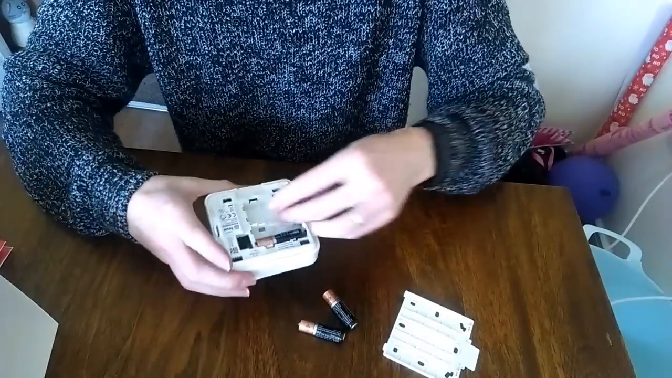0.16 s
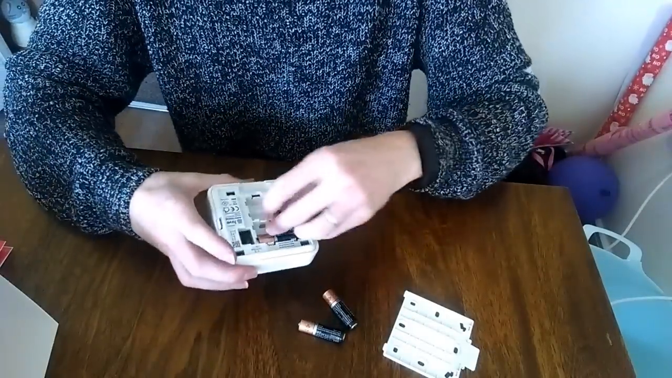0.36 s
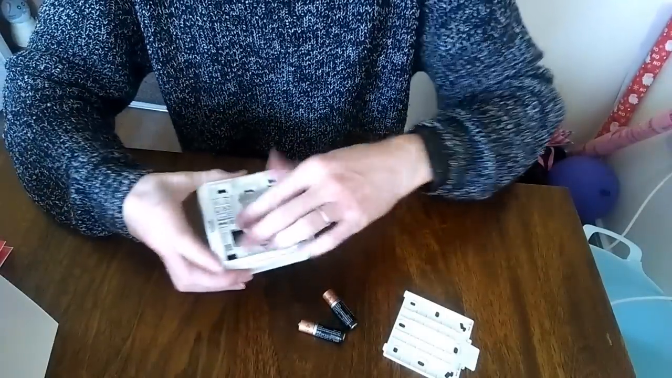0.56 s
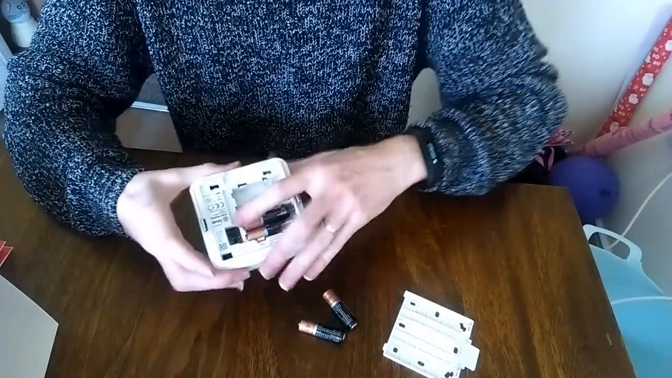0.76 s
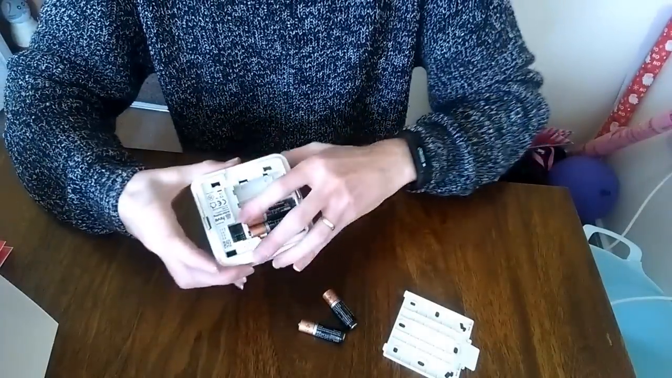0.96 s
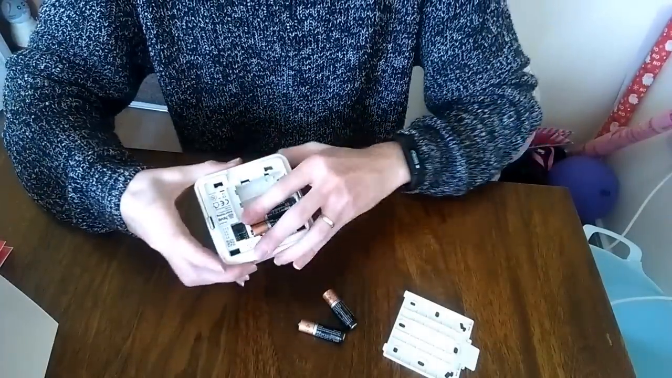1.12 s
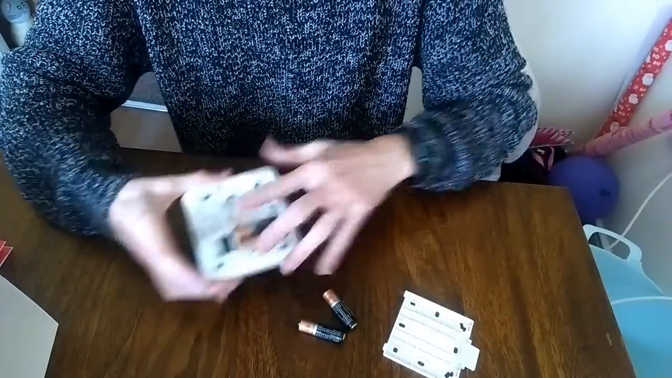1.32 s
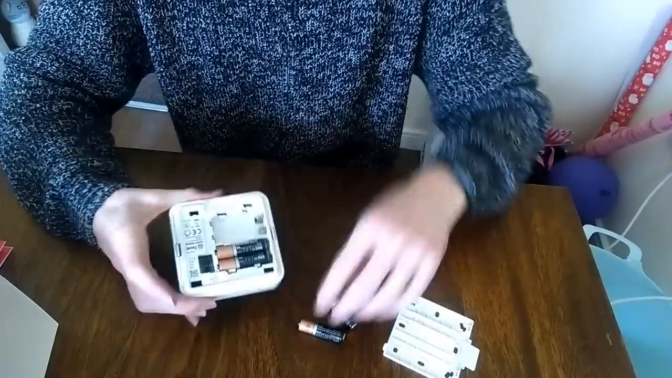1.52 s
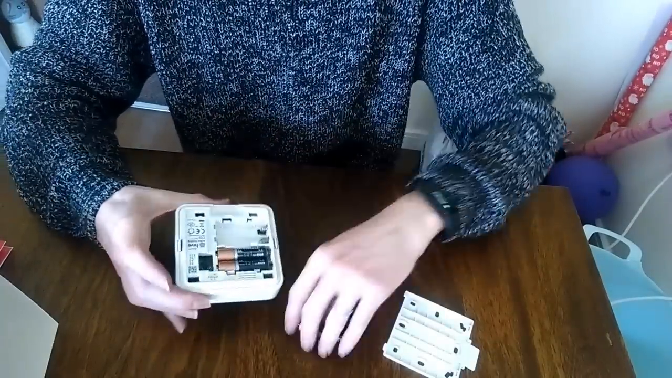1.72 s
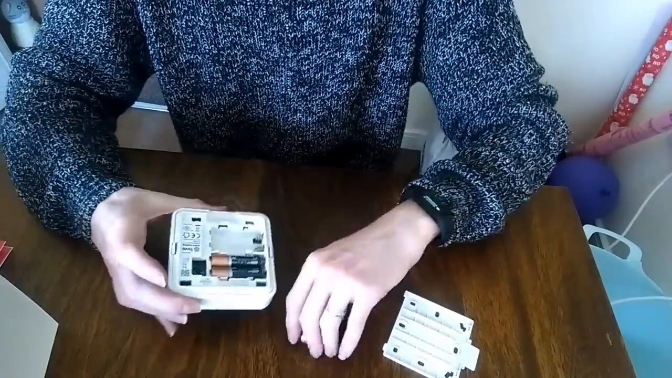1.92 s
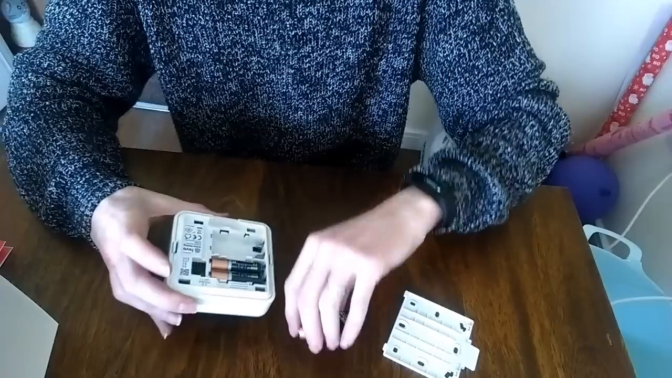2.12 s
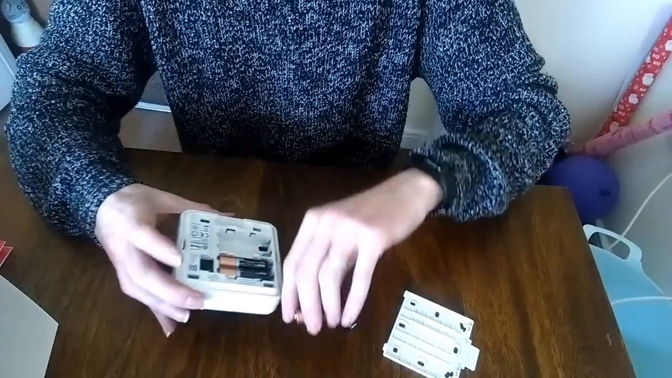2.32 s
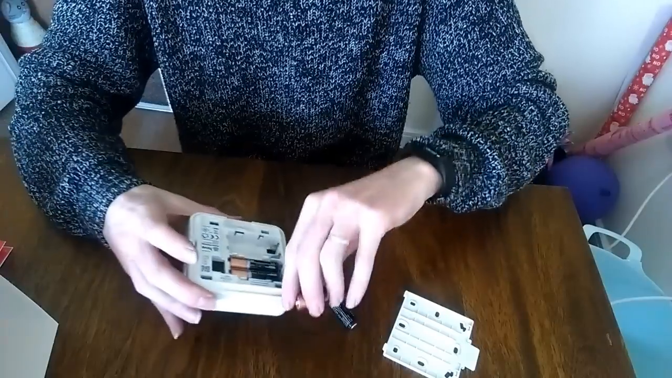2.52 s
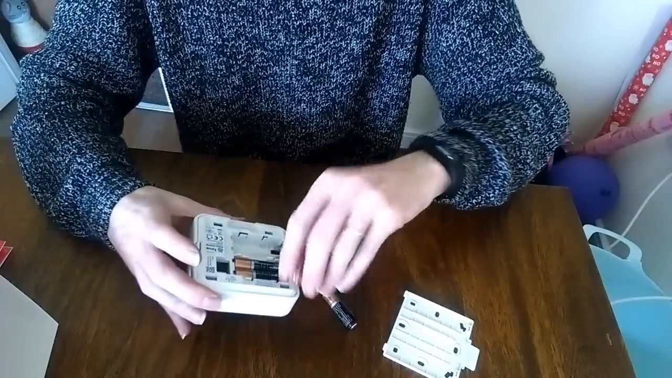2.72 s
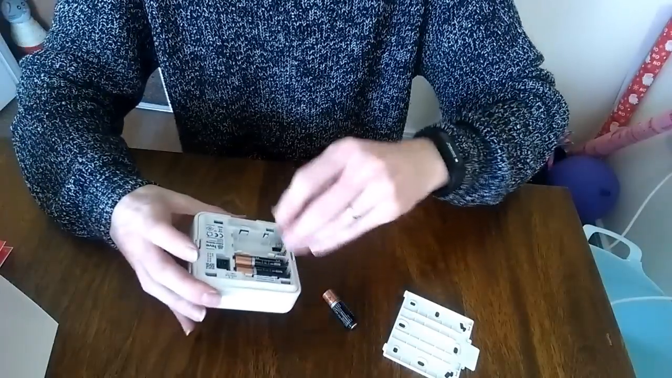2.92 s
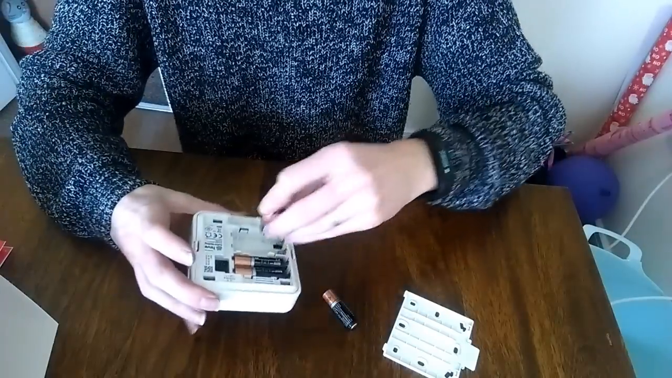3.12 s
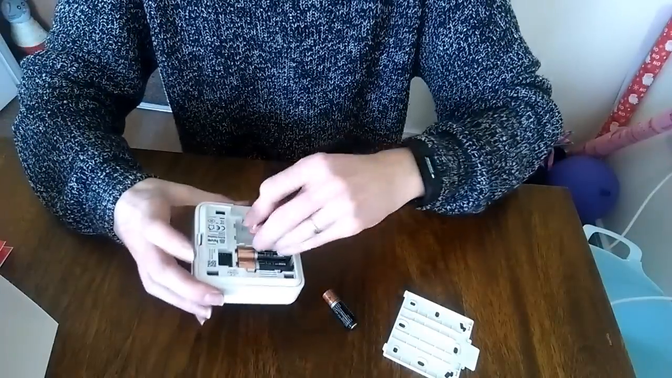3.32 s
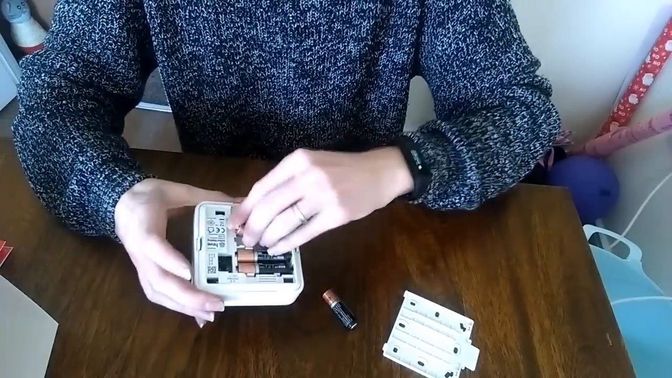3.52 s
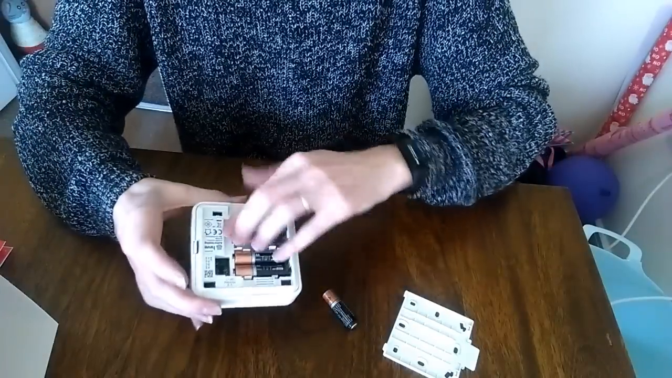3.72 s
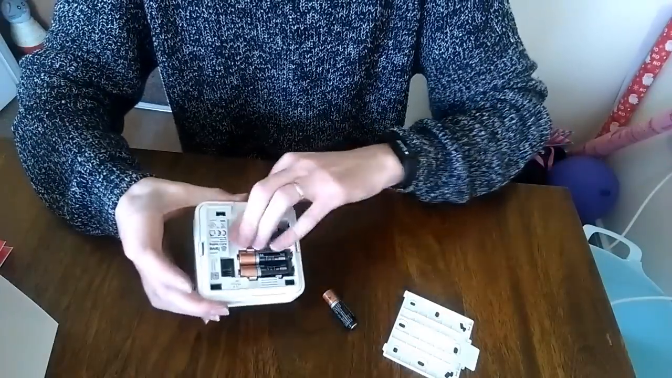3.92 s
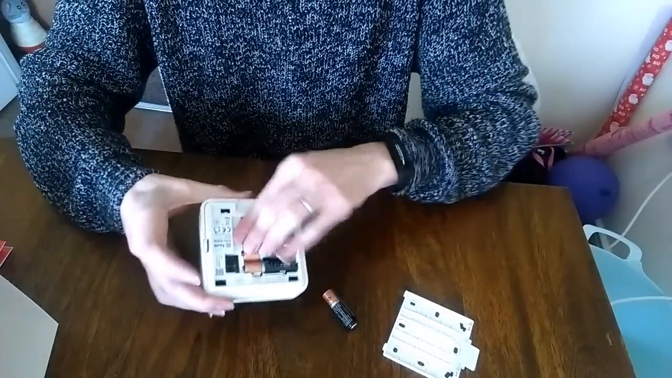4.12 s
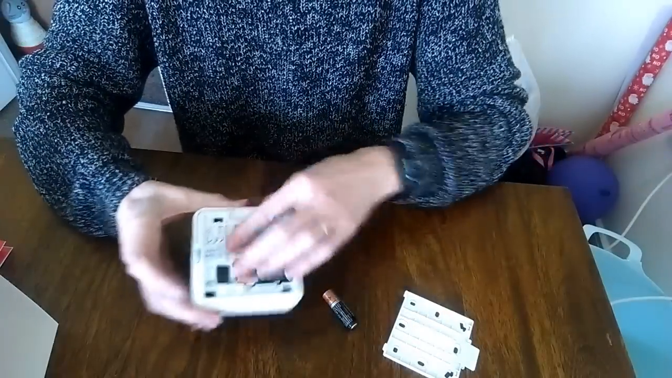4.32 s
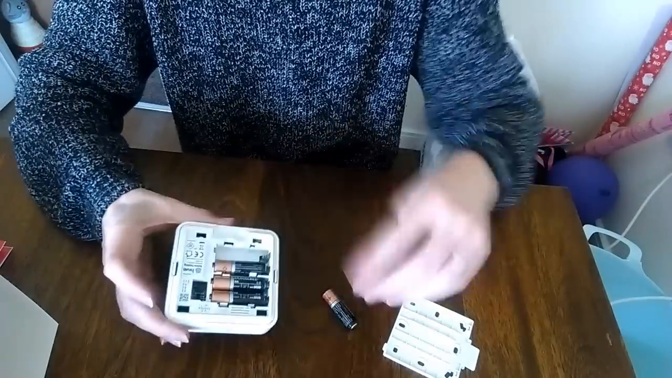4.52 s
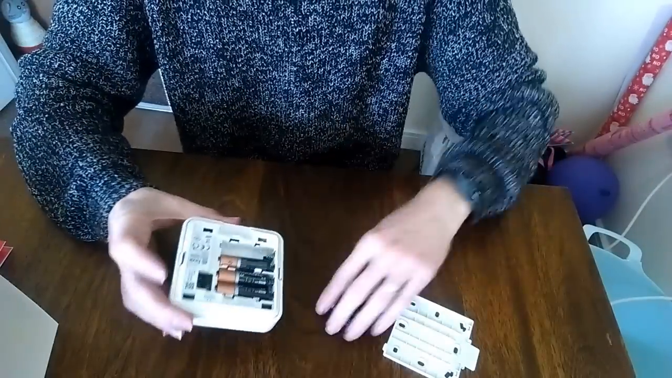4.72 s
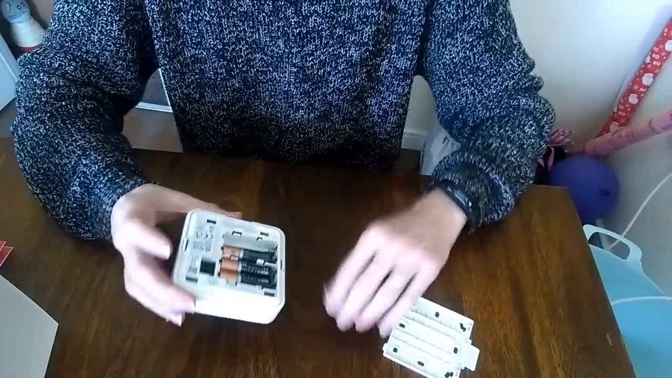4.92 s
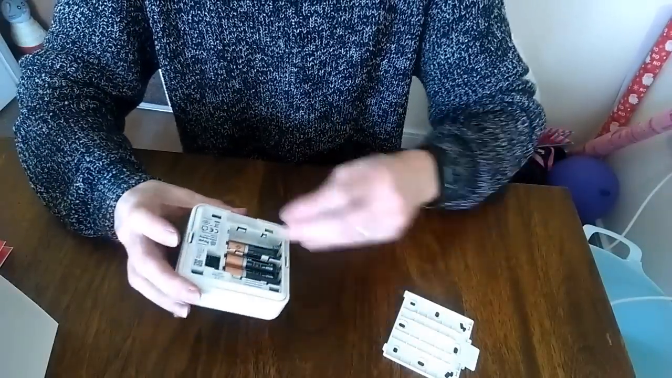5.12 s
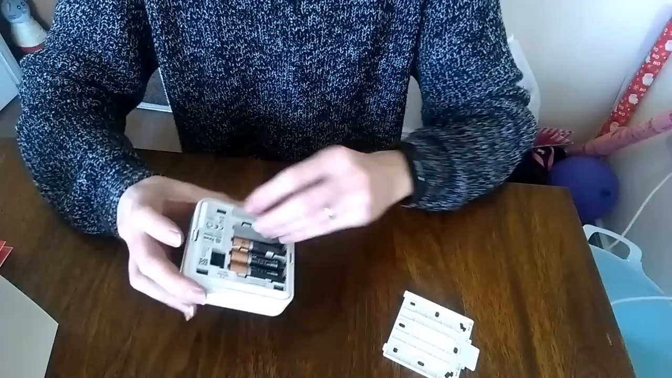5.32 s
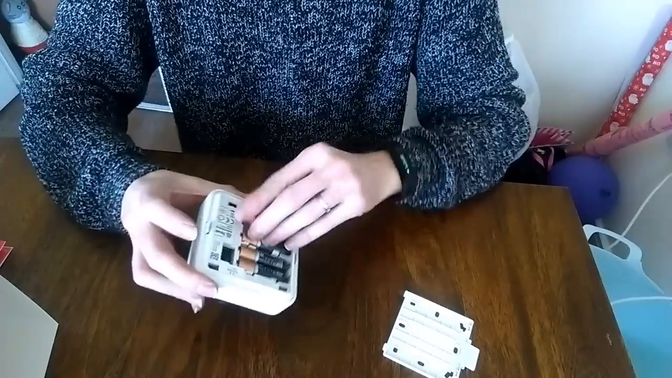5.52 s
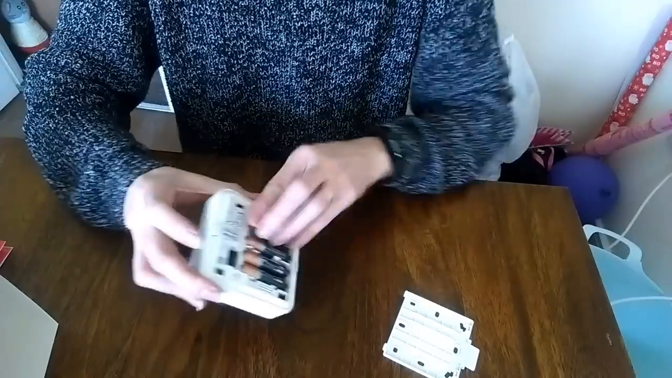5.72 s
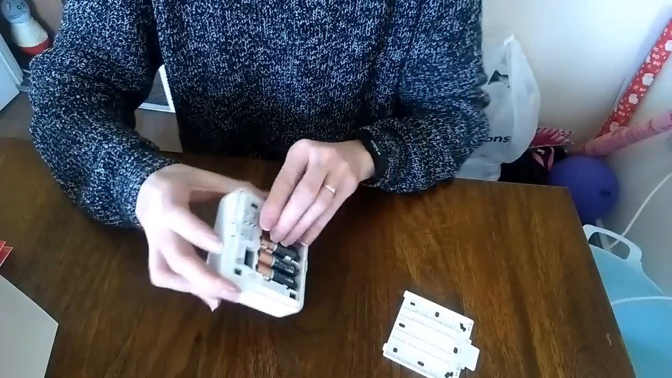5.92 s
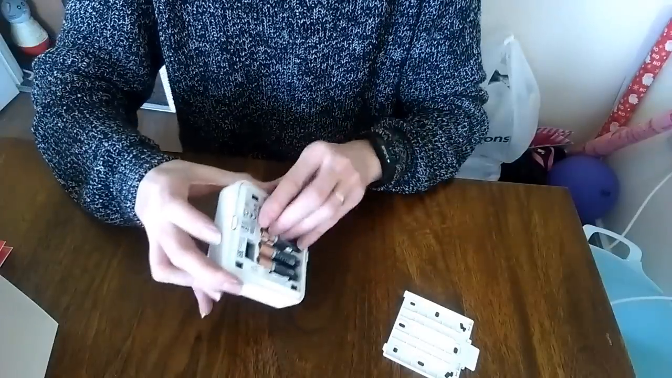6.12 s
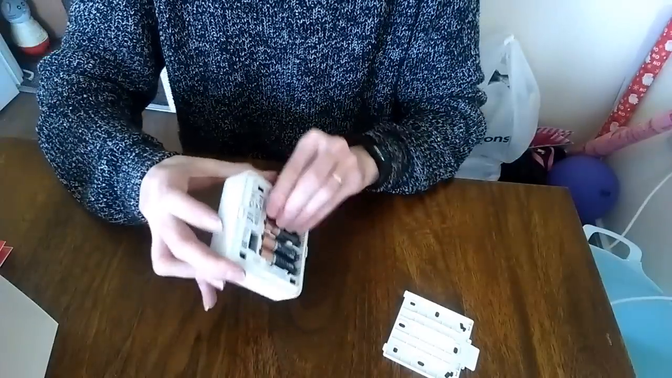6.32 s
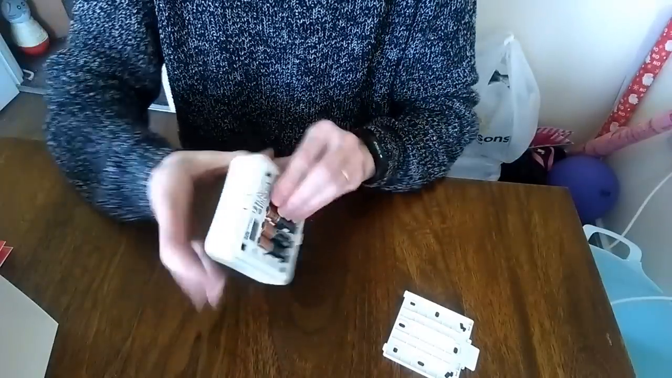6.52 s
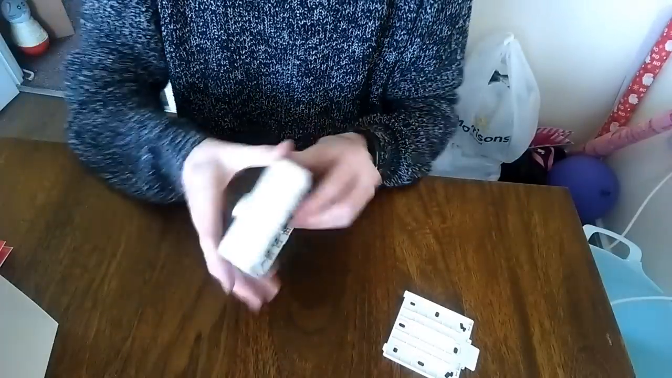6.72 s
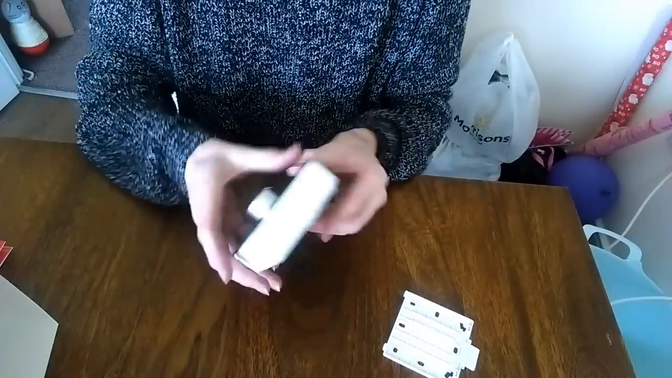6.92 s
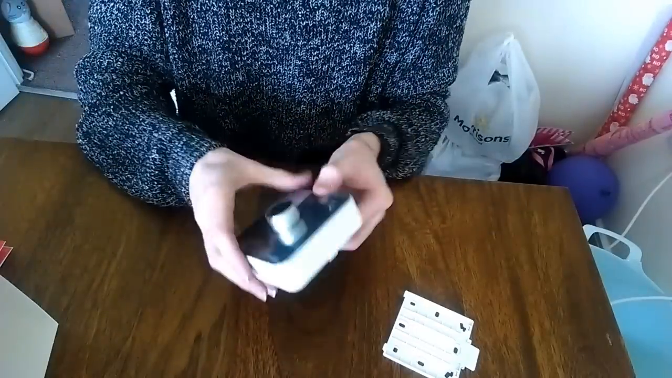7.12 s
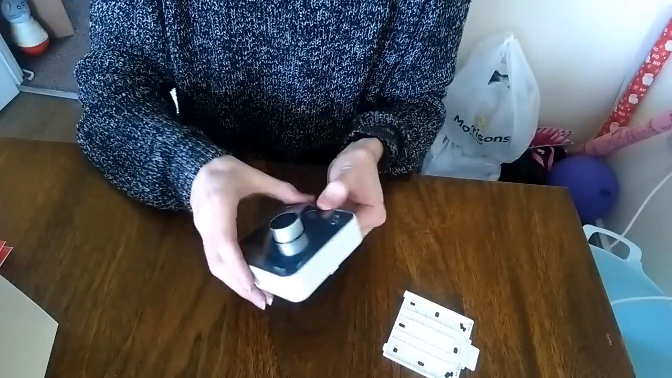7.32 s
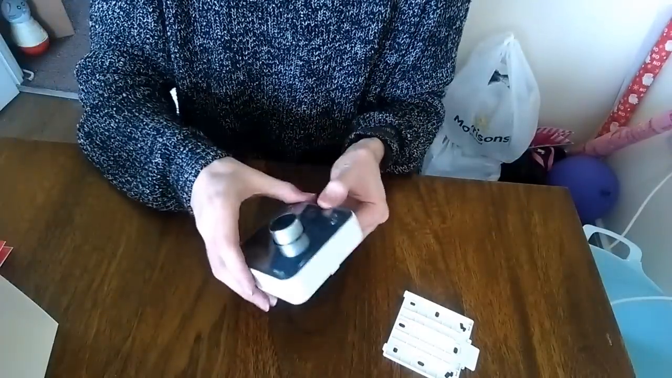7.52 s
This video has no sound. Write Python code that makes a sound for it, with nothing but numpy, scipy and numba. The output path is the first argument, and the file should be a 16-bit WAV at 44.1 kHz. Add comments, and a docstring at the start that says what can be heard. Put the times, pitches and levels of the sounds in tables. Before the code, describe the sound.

Close, sharp plastic clacks and tiny spring ticks as batteries are pressed into a small device in a quiet room.

```python
"""In a small, lively room, over a wooden table, batteries are pressed into an open plastic wall control.
An appliance hums faintly. Fingers thud on the table, skin and batteries rub over the plastic, and the
battery springs squeak and tick as they slip. Loudest are the clacks: a battery hits the casing and
makes it ring. Two microphones listen, the right one nearer and brighter, and a limiter (an automatic
volume control) holds the hardest snaps down."""
import sys
import numpy as np
from scipy import signal
from scipy.fft import rfft, irfft, next_fast_len
from scipy.io import wavfile
from scipy.ndimage import minimum_filter1d
from numba import njit

SR = 44100
rng = np.random.default_rng(int(sys.argv[2]) if len(sys.argv) > 2 else 0)


def store_wav(level_fs):
    """Save 16-bit WAV to argv[1]."""
    pcm = np.round(np.clip(np.atleast_2d(level_fs), -1, 1) * 32767)
    wavfile.write(sys.argv[1], SR, pcm.T.astype(np.int16))


N = 333396

# How loud the background noise is over time: t/s, level/dB
NOISE_LEVELS = [(0.0, -62), (0.398, -64), (0.648, -59), (0.998, -63), (1.35, -60), (1.542, -64),
                (3.368, -67), (3.578, -61), (4.632, -64), (4.992, -62), (5.298, -66), (5.708, -61),
                (7.368, -64), (7.56, -60)]
# Its balance of low and high sound: f/Hz, relative level/dB
NOISE_COLOUR = [(21, -32.5), (40, -6.5), (75, -16.5), (130, -9), (216, -6), (265, -20), (301, -10),
                (370, -26), (400, -11), (503, -15.5), (618, -18.5), (979, -13), (1200, -23.5), (1720, -22),
                (4210, -28), (14000, -34), (15700, -32.5), (16400, -44)]
# How alike it is in the two microphones: f/Hz, likeness (0 to 1)
NOISE_LIKENESS = [(30, 1), (70, .45), (140, 1), (300, 1), (700, 0.44), (1500, 0.13), (8000, .1)]
# The tones of the appliance hum: f/Hz, relative level/dB
HUM_TONES = [(101, -75), (300, -76.5), (399, -76.5), (640, -87), (775, -82.5), (974, -89), (1006, -80.5)]
# How long the room echoes (a decay is the time to fade by 60 dB): f/Hz, decay/s
ECHO_DECAY = [(300, 0.43), (1000, 0.37), (2100, 0.39), (5500, 0.42), (14600, 0.25)]
# How strongly the echo starts: f/Hz, level/dB
ECHO_COLOUR = [(300, -26), (1000, -22.5), (2100, -26), (5500, -25), (14600, -21.5)]
# How much weaker the left microphone hears near treble: f/Hz, left minus right level/dB
MIC_TILT = [(300, 1), (1000, -2), (2000, -6), (4000, -8), (8000, -13), (14000, -18)]
# Skin and batteries sliding over plastic: start t/s, end t/s, start level/dB, end level/dB
RUBS = [(0.56, 0.65, -59.5, -73), (0.7, 0.85, -70.5, -66), (3.73, 3.85, -59, -70.5),
        (4.26, 4.497, -73.5, -74.5), (5.7, 6.097, -70.5, -67.5), (6.629, 6.702, -63, -72),
        (6.837, 6.99, -69, -70.5), (7.062, 7.164, -60, -79)]
# The balance of low and high in that rubbing: f/Hz, relative level/dB
RUB_COLOUR = [(1500, -10), (3000, -10), (4000, 0), (4800, -3), (5700, -9.5), (7500, -9.5), (10500, -6),
              (11800, -8.5), (13000, -3.5), (16000, -35.5)]
# Squeaks of squeezed springs and of skin on plastic:
# start t/s, end t/s, start f/Hz, end f/Hz, width/Hz, level before fading/dB
SQUEAKS = [(0.39, 0.422, 10500, 10500, 900, -69), (4.278, 4.484, 4520, 4150, 350, -60),
           (5.846, 6.11, 5640, 6000, 300, -68), (5.862, 6.092, 12200, 12000, 1500, -74),
           (6.005, 6.095, 4120, 3830, 400, -56), (6.202, 6.41, 5970, 5650, 250, -79),
           (6.96, 7.05, 13000, 13200, 1500, -55.5), (6.973, 7.053, 4700, 4400, 706, -61)]
# Fingers landing on the table: t/s, thud level/dB, contact time/s, nail click level/dB
THUDS = [(1.977, -39.5, 0.0005, -39), (4.925, -40, 0.0014, -44)]
# The table's modes, the tones it rings with when hit: f/Hz, level/dB, decay/s
TABLE_MODES = [(85, -5, 0.18), (137.5, 1, 0.18), (178.6, -4, .18), (256, 7, 0.051), (473, -2, 0.05),
               (785, -20.5, 0.014)]
# The clearest ticks of springs slipping on the contacts: t/s, peak level/dB
TICKS = [(0.3795, -41), (0.4094, -41), (0.58, -42), (0.7605, -39), (0.8477, -42), (0.8807, -45),
         (0.9253, -51), (0.9763, -42.5), (3.3355, -47), (3.8082, -36), (3.8714, -47), (3.9006, -56),
         (3.9173, -54), (3.9645, -44.5), (3.9932, -50), (4.0724, -40), (4.116, -36), (4.3244, -46),
         (4.362, -42), (4.3914, -40), (4.4099, -43.5), (4.4358, -42.5), (4.4808, -61), (4.5418, -50),
         (4.606, -45), (4.7354, -41.5), (4.887, -47), (5.742, -45.5), (5.8183, -42), (5.885, -58),
         (5.903, -47), (5.921, -45), (5.8609, -31.5), (5.9618, -38), (6.0046, -36), (6.0432, -42),
         (6.0771, -38), (6.207, -37.5), (6.2532, -42), (6.311, -40.5), (6.351, -37.5), (6.3739, -42),
         (6.5477, -43), (6.569, -43)]
# Runs of fainter ticks as squeezed springs creep: start t/s, end t/s, typical peak level/dB
CREEPS = [(0.375, 0.42, -50), (0.796, 1.035, -54), (3.846, 4.037, -46), (4.27, 4.394, -53),
          (5.775, 6.1, -63), (6.187, 6.408, -50.5)]
# The tones a spring rings with: f/Hz, level/dB, decay/s
SPRING_MODES = [(4070, -4.5, .006), (5600, -1, .005), (6500, -5, .003), (8500, -2.5, .002),
                (11100, 0.5, .003), (13000, -2.5, .003), (14800, -10.5, .002)]
# A battery hits the casing with a hollow thump, a plastic knock and a metal click: t/s, thump level/dB,
# knock level/dB, knock pitch/octaves above 1 kHz, click level/dB, click pitch/octaves above 1 kHz,
# relative level sent to the walls/dB
CLACKS = [(0.044, -51.5, -35, 1.02, -47, 2.4, -9), (0.339, -50.5, -31.5, 0.88, -40, 2.44, -8.5),
          (0.478, -45, -21, 0.9, -32.5, 1.73, -8.5), (0.495, -42.5, -28, 0.29, -44.5, 3.0, -6),
          (0.63, -49, -34, 1.3, -36.5, 2.5, -4.5), (0.669, -64, -26.5, 1.54, -29.5, 2.82, -6.5),
          (0.696, -60, -23, 1.05, -45, 2.3, -10), (0.746, -39.5, -20.5, 0.84, -39, 2.8, -11.5),
          (0.993, -68, -41, 0.77, -45, 2.5, -9), (1.1616, -30.5, -1.5, 0.9, -5.5, 2.27, -10),
          (1.1977, -20, 2, 1.01, -4, 2.48, -10.5), (3.451, -38.5, -20, 1.8, -17.5, 1.73, -7.5),
          (3.502, -37, -26, 0.36, -31.5, 2.5, -12.5), (3.658, -70, -59.5, 0.9, -39, 2.9, -4.5),
          (3.684, -55, -37.5, 1.2, -46, 2.5, 3), (3.694, -44, -33, 0.78, -30.5, 2.9, -7),
          (3.715, -60, -16, 0.67, -36, 2.5, -12), (3.819, -47.5, -37, .4, -36.5, 2.7, -12.5),
          (4.037, -42.5, -19, 0.67, -25, 2.15, -9.5), (4.161, -44.5, -28.5, 0.8, -31.5, 3.23, 5.5),
          (4.169, -37, -38, 0.68, -24.5, 2.9, -24), (4.177, -55, -10.5, 0.48, -33, 3.7, -13.5),
          (4.47, -56, -50.5, 0.61, -53, 2.9, -5), (4.533, -57.5, -50.5, .4, -54, 3.7, -7.5),
          (5.541, -41.5, -17, 0.76, -28.5, 2.34, -8.5), (5.637, -46.5, -41, 0.92, -33.5, 2.1, -6.5),
          (5.648, -67, -45, .6, -32, 3.3, -10), (5.673, -56, -22.5, 0.87, -33, 1.7, -8),
          (5.717, -56, -51, 1.2, -34, 2.24, -13), (6.122, -46.5, -24, 1.07, -32, 2.18, -9),
          (6.41, -37, -14.5, 0.83, -18.5, 2.36, -10.5), (6.52, -68.5, -66, 1.1, -41, 3.1, -7),
          (6.921, -62, -67, 0.99, -45.5, 2.7, -1.5), (6.948, -54, -33.5, 2, -37, 2, -4),
          (6.968, -50.5, -41, 1.6, -31.5, 4.25, -18.5), (7.337, -52, -37, 1.53, -33.5, 3.3, -6),
          (7.4506, -15, 2.5, 0.84, -2.5, 2.92, -6.5)]
# The tones the casing and its batteries ring with: f/Hz, level/dB, decay/s
CASING_MODES = [(478.5, -2.5, 0.036), (640.6, 0, .02), (812, 4, 0.017), (1150, -12, .012),
                (1341, 1.5, 0.017), (1530, -2.5, 0.016), (1900, -2.5, .01), (2194, -0.5, 0.0049),
                (2606, 1, .006), (2950, 1, 0.0054), (3620, 1.5, 0.005), (4150, 1.5, 0.0032),
                (4840, -2, .003), (6000, 1, 0.0018), (7143, -1.5, 0.0018), (8420, -4, .002),
                (9730, -0.5, 0.0023), (11620, -2.5, 0.0029), (12900, -2, .002), (14200, -6.5, 0.0016)]
# The borders that sort those tones into six bands: f/Hz
CASING_BAND_EDGES = (330, 1000, 1750, 3000, 5500, 10000, 15500)


def from_db(db):
    """Turn decibels into a factor to multiply a sound by."""
    return 10 ** (np.asarray(db) / 20)


def rms_one(x):
    """Scale a sound so that its average strength (rms) is 1."""
    return x / np.sqrt(np.mean(x ** 2) + 1e-20)


def at_hz(points, hz):
    """Read between the rows of a table, giving every octave equal space."""
    table_hz, values = np.transpose(points)
    return np.interp(np.log(hz), np.log(table_hz), values)


def shaped(x, gain):
    """Filter a sound: multiply each frequency in it by gain(hz)."""
    size = next_fast_len(x.shape[-1] + 4096)
    hz = np.maximum(np.arange(size // 2 + 1) * SR / size, 1)
    return irfft(rfft(x, size) * gain(hz), size)[..., :x.shape[-1]]


def add(out, start_s, sound, room_db=0.):
    """Mix a strike into three rows: left, right and what reaches the walls."""
    i = round(start_s * SR)
    out[:, i:i + sound.shape[1]] += from_db([[0], [0], [room_db]]) * sound[[0, 0, 1], :N - i]


def rings(modes, spread_db, size):
    """A struck object rings with fading tones, one a row, each with a slightly random strength."""
    hz, db, decay_s = np.transpose(modes)[:, :, None]
    t = np.arange(size) / SR
    start_db = db + spread_db * rng.standard_normal(hz.shape)
    return from_db(start_db - 60 * t / decay_s) * np.sin(2 * np.pi * hz * t)


def strike(ring, contact_s):
    """Two rows: the ring set off by a short rough push (peak 1), and a clean one of equal energy."""
    t = np.arange(400) / SR
    push = rng.standard_normal(400) * t ** 2 * np.exp(-t / contact_s)
    near = np.convolve(ring, push)[:len(ring)]
    near = near / np.abs(near).max()
    to_walls = ring * np.linalg.norm(near) / np.linalg.norm(ring)
    return np.array([near, to_walls])


def background_noise():
    """The room's soft noise, more alike on both sides in the bass than in the treble."""
    shared, apart = rng.standard_normal((2, N))
    colour = lambda hz: from_db(at_hz(NOISE_COLOUR, hz))
    middle = shaped(shared, lambda hz: colour(hz) * np.sqrt(1 + at_hz(NOISE_LIKENESS, hz)))
    side = shaped(apart, lambda hz: colour(hz) * np.sqrt(1 - at_hz(NOISE_LIKENESS, hz)))
    return rms_one(np.array([middle + side, middle - side]))


def appliance_hum(half_width_hz=14, side_db=-4):
    """An appliance hums: each tone is a very narrow band of noise, so it wavers."""
    blend = np.array([[1, 1], [1, -1.2]]) * from_db([0, side_db])   # a shared and an opposed part
    hum = np.zeros((2, N))
    for hz, db in HUM_TONES:
        noise = blend @ rng.standard_normal((2, N))
        tone = shaped(noise, lambda f: 1 / (1 + ((f - hz) / half_width_hz) ** 2))
        hum += from_db(db) * rms_one(tone)
    return hum


def room_echo(sound, echo_s=.0115, echo_db=-13):
    """The walls throw sound back: a tail of noise, each octave fading at its own speed."""
    t, tail = np.arange(SR // 2) / SR, 0
    for low_hz in 125 * 2. ** np.arange(7):
        octave = signal.butter(2, [low_hz, 2 * low_hz], "band", fs=SR, output="sos")
        noise = signal.sosfilt(octave, rng.standard_normal((2, len(t))))
        hz = low_hz * np.sqrt(2)
        tail = tail + noise * from_db(at_hz(ECHO_COLOUR, hz) - 60 * t / at_hz(ECHO_DECAY, hz))
    tail *= np.clip((t - .002) / .00067, 0, 1)   # the echo needs a moment to arrive
    tail[:, round(echo_s * SR)] += from_db(echo_db)   # a single clear echo follows about 11 ms later
    return signal.fftconvolve(sound[None], tail, axes=1)[:, :N]


def rubbing(fade_s=.035):
    """Skin and batteries stick and slip on plastic, making a dense stream of tiny uneven clicks."""
    t, level = np.arange(N) / SR, np.zeros(N)
    for start, end, start_db, end_db in RUBS:
        fade = np.clip(np.minimum(t - start, end - t) / fade_s, 0, 1)
        level += fade * from_db(np.interp(t, [start, end], [start_db, end_db]))
    grains = rng.standard_normal(N) * from_db(6.7 * np.minimum(rng.exponential(1, N), 3.5))
    grains *= rng.random(N) < .2   # keep about one in five
    rub = shaped(grains, lambda hz: from_db(at_hz(RUB_COLOUR, hz) - 40 * (hz < 1200)))
    return level * rms_one(rub)


def squeaks(slips_per_s=110, slip_s=.0025, slip_floor=.23, fade_db=16):
    """Springs and skin squeak in quick uneven slips, which chop up a rough, gliding tone."""
    out = np.zeros(N)
    for start, end, from_hz, to_hz, width_hz, db in SQUEAKS:
        i, n = round(start * SR), round((end - start) * SR)
        smooth = signal.butter(2, width_hz / 2, fs=SR, output="sos")
        sway = signal.sosfilt(smooth, rng.standard_normal((2, SR // 2)))[:, :n]
        phase = 2 * np.pi * np.cumsum(np.linspace(from_hz, to_hz, n)) / SR
        tone = sway[0] * np.cos(phase) + sway[1] * np.sin(phase)
        gaps = rng.uniform(.5, 1.5, 100) * SR / slips_per_s
        slips = np.isin(np.arange(n), np.cumsum(gaps).astype(int) - int(gaps[0])) * 1.
        chop = slip_floor + signal.lfilter([1], [1, -np.exp(-1 / (slip_s * SR))], slips)
        progress = np.linspace(0, 1, n)
        soft_ends = np.clip(np.minimum(30 * progress, 5 * (1 - progress)), 0, 1)
        out[i:i + n] += from_db(db - fade_db * progress) * soft_ends * rms_one(chop * tone)
    return out


def finger_thuds():
    """A soft push makes the table top boom, while the nails click on loose plastic."""
    out = np.zeros((3, N))
    for start, db, contact_s, nail_db in THUDS:
        wood = rings(TABLE_MODES, spread_db=1, size=8192).sum(0)
        plastic = rings(CASING_MODES, spread_db=2, size=2048).sum(0)
        add(out, start, from_db(db) * strike(wood, contact_s))
        add(out, start, from_db(nail_db) * strike(plastic, contact_s=.001))
    return out


def spring_ticks(creep_gap_s=.016, creep_spread_db=2):
    """Each slip of a spring makes it ring with a tiny bright tick, alone or in a creeping run."""
    out, ticks = np.zeros((3, N)), list(TICKS)
    for start, end, db in CREEPS:
        times = start + creep_gap_s * np.cumsum(rng.uniform(.4, 1.6, 40))
        levels = db + creep_spread_db * rng.standard_normal(40)
        ticks += [(time, level) for time, level in zip(times, levels) if time < end]
    for start, db in ticks:
        coil = rings(SPRING_MODES, spread_db=3, size=512).sum(0)
        add(out, start, from_db(db) * strike(coil, contact_s=.00012), room_db=-11.5)
    return out


def hump(octaves, db, pitch, fall_below, fall_above):
    """Power that is greatest at one pitch and falls to each side by so many dB per octave."""
    below, above = np.maximum(pitch - octaves, 0), np.maximum(octaves - pitch, 0)
    return from_db(db - fall_below * below - fall_above * above) ** 2


def casing_clacks():
    """A battery hits the casing, and the force of the blow is shared among six bands of ringing tones."""
    out = np.zeros((3, N))
    band_of_mode = np.digitize(np.array(CASING_MODES)[:, 0], CASING_BAND_EDGES[1:])
    edges = list(zip(CASING_BAND_EDGES, CASING_BAND_EDGES[1:]))
    filters = [signal.butter(3, edge, "band", fs=SR, output="sos") for edge in edges]
    octaves = np.log2(np.sqrt(np.prod(edges, axis=1)) / 1000)   # band centres, counted from 1 kHz
    for start, thump_db, knock_db, knock_pitch, click_db, click_pitch, room_db in CLACKS:
        knock = hump(octaves, knock_db, knock_pitch, fall_below=19.5, fall_above=13)
        click = hump(octaves, click_db, click_pitch, fall_below=6.5, fall_above=9.5)
        force = np.sqrt(knock + click)
        force[0] = from_db(thump_db)   # the lowest band is the hollow of the casing
        modes = rings(CASING_MODES, spread_db=2, size=2048)
        bands = [signal.sosfilt(sos, modes[band_of_mode == k].sum(0)) for k, sos in enumerate(filters)]
        blow = sum(gain * strike(ring, contact_s=.0008) for gain, ring in zip(force, bands))
        add(out, start - .001, blow, room_db)
    return out


def microphones(sound, tilt_share, left_lag_s=6 / SR):
    """The left microphone is farther away: it hears later, and with less treble, than the right."""
    tilt = lambda hz: from_db(tilt_share * at_hz(MIC_TILT, hz) / 2)
    left = shaped(sound[0], lambda hz: tilt(hz) * np.exp(-2j * np.pi * hz * left_lag_s))
    right = shaped(sound[1], lambda hz: 1 / tilt(hz))
    return np.array([left, right])


@njit
def limiter_cut_db(over_db, attack_s, release_s):
    """How far the limiter turns the sound down: it reacts quickly and lets go slowly."""
    attack, release = 1 / (attack_s * SR + 1), 1 / (release_s * SR + 1)
    cut_db, now = np.empty_like(over_db), 0.
    for i in range(len(over_db)):
        now += (attack if over_db[i] > now else release) * (over_db[i] - now)
        cut_db[i] = now
    return cut_db


def scene():
    """Noise and hum swell and sink together behind the close handling sounds and their echo."""
    times, levels = np.transpose(NOISE_LEVELS)
    level_db = np.interp(np.arange(N) / SR, times, levels)
    noise = from_db(level_db) * background_noise()
    hum = from_db(level_db - level_db.mean() + 5) * appliance_hum()
    squeak = squeaks() * np.array([[1], [1], [0]])   # left and right only, no echo
    handling = squeak + casing_clacks() + finger_thuds() + rubbing() + spring_ticks()
    direct = microphones(handling[:2], tilt_share=1)
    echo = microphones(room_echo(handling[2]), tilt_share=.13)
    return noise + hum + echo + direct


def record(dry, limit_db=-8, low_cut_hz=25, high_cut_hz=16750):
    """The limiter dips just after a hard snap; peaks are rounded, the lowest and highest sound is cut."""
    peak = -minimum_filter1d(-np.abs(dry).max(0), size=45)   # the largest value within about 1 ms
    over_db = np.maximum(20 * np.log10(peak + 1e-9) - limit_db, 0)
    held = dry * from_db(-limiter_cut_db(over_db, attack_s=.0021, release_s=.053))
    rounded = .9 * np.tanh(held / .9)
    low_cut = signal.butter(3, low_cut_hz, "high", fs=SR, output="sos")
    high_cut = signal.cheby2(10, 60, high_cut_hz, fs=SR, output="sos")
    return signal.sosfilt(high_cut, signal.sosfilt(low_cut, rounded))


dry = scene()
out = record(dry)
store_wav(out)
```